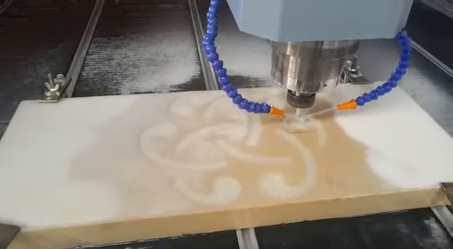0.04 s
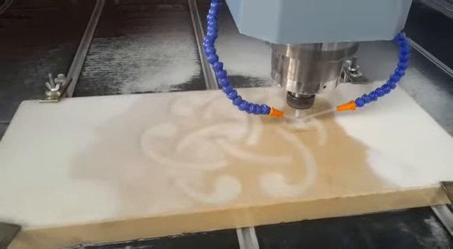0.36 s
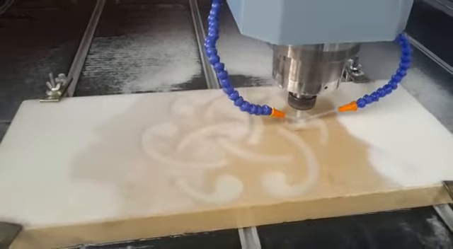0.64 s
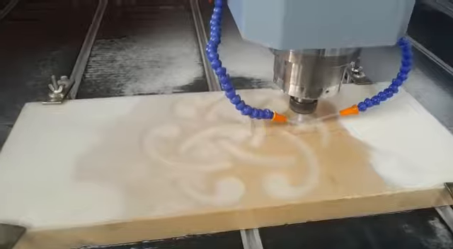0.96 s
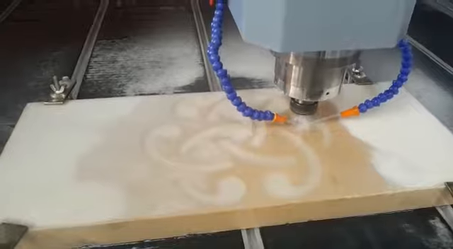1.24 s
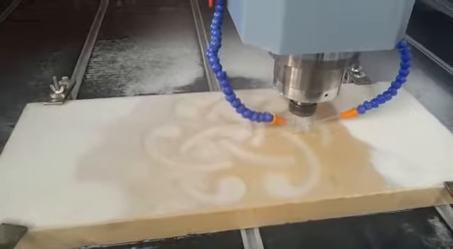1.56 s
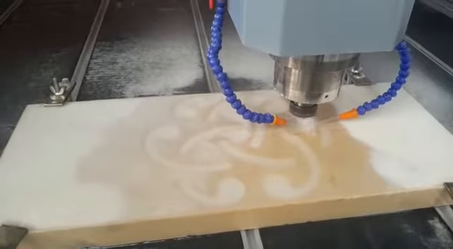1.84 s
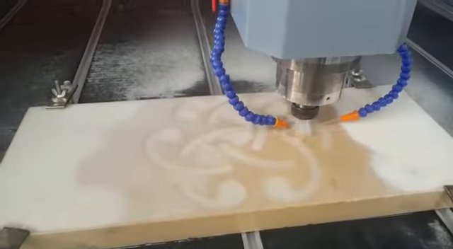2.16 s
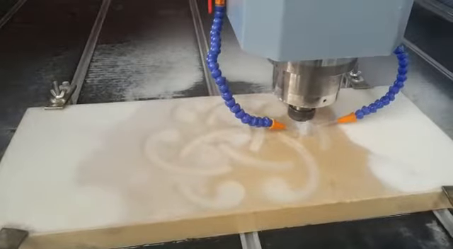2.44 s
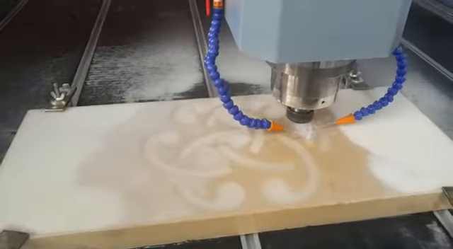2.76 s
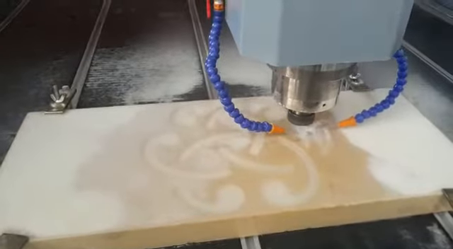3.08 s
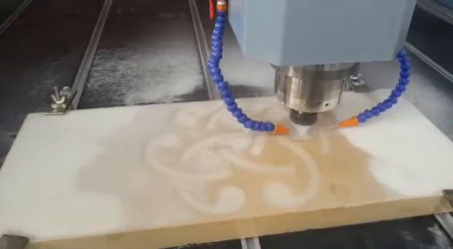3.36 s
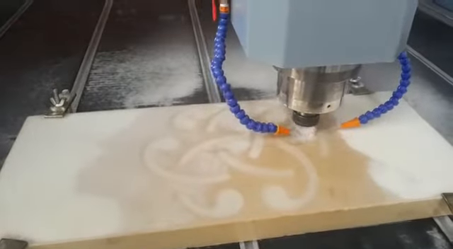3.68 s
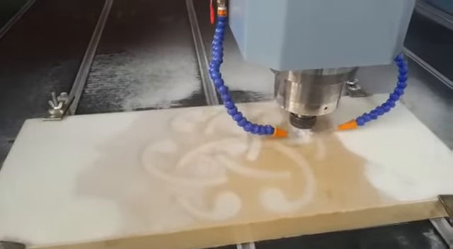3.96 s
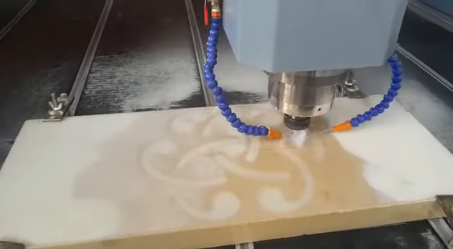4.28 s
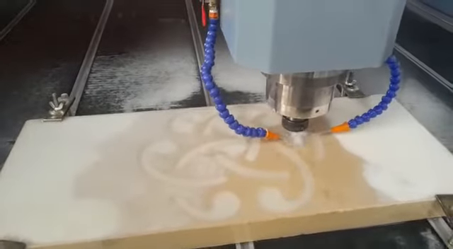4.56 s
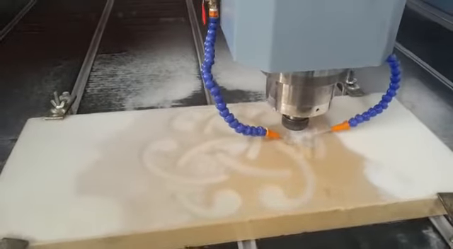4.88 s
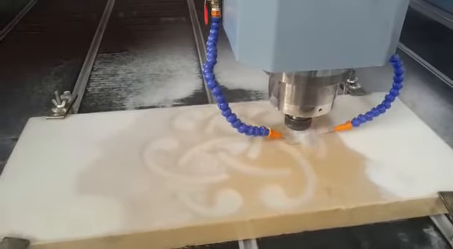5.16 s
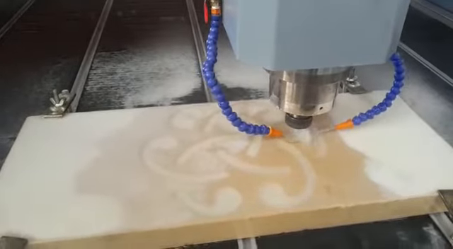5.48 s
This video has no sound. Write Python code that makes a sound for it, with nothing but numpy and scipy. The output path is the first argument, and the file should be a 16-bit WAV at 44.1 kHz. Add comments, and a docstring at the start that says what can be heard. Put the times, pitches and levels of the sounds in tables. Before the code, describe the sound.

In a workshop, a router spindle spins over a wet stone slab, humming and whining in a swelling rush of air and coolant spray. After nearly two seconds the bit bites and the rush falls back. Shrill, ringing scrapes follow in uneven passes, with short chattering squeals, while the feed motors sing faintly underneath. The treble sits mostly in the left microphone.

```python
"""A router spindle turns at 18000 rpm over a wet stone slab in a workshop. Its unbalance hums and its
motor whines in a swelling rush of air and coolant. From 1.3 s the feed motors sing as they move the head.
At 1.8 s the bit bites and the rush falls back: the bit scrapes the stone once a turn, rings shrilly and
chatters in bursts to the end. The treble reaches mostly the left microphone."""
import sys
import numpy as np
from scipy import signal
from scipy.fft import rfft, irfft, next_fast_len
from scipy.io import wavfile
from scipy.ndimage import uniform_filter1d, minimum_filter1d, map_coordinates

SR = 44100
rng = np.random.default_rng(int(sys.argv[2]) if len(sys.argv) > 2 else 0)


def unload_audio(sound):
    """Save the sound as a 16-bit wav file, at the path given as the first command line argument."""
    columns = np.transpose(np.atleast_2d(sound))
    # keep every value between -1 and 1, then stretch to whole-number steps
    steps = np.round(np.clip(columns, -1, 1) * 32767)
    wavfile.write(sys.argv[1], SR, steps.astype(np.int16))


N = 247842
TIME_S = np.arange(N) / SR
TURN_HZ = 299.65
BITE_S, ENTRY_S = 1.765, 0.07
BUILD_S = 0.39  # time constant of the opening swell

# Stereo balance. Each row: frequency in Hz, left over right in dB.
PAN = [(100, 1), (300, 2), (500, 0.5), (1200, -0.5), (1900, -4), (2800, -7), (3800, -1), (4600, 1),
       (5400, 8.5), (6200, 11.5), (7600, 25.5), (9300, 14), (10200, 18), (12000, 85)]
# Passes of the bit through the stone. Each row: start and end in seconds, scrape level in dB,
# share that follows its own marks from 0 to 1, brightness in dB per octave.
PASSES = [(1.79, 1.815, -23, .9, 0), (1.825, 1.9, -17.6, .95, 12), (1.9, 1.945, -20.5, .95, 0),
          (1.96, 2.16, -21.4, .8, 2), (2.175, 2.3, -22, .95, -6), (2.38, 2.44, -33, .5, 0),
          (2.755, 3.0, -23.1, .95, -1), (3.038, 3.29, -23, .95, -4), (3.3, 3.78, -25.3, .4, -1),
          (3.78, 3.935, -24.3, .35, 13), (3.945, 3.995, -22.8, .9, 0), (4.005, 4.035, -23, .9, -16),
          (4.055, 4.12, -26, .8, -12), (4.13, 4.34, -24.3, .5, -1), (4.355, 4.72, -26.3, .3, 3),
          (4.92, 5.14, -23.2, .95, -2), (5.2, 5.52, -24.5, .7, 0), (5.56, 5.7, -24, .95, -2)]


def amp(db):
    """Decibels to gain."""
    return 10 ** (np.asarray(db) / 20)


def along(points, hz):
    """Interpolate (Hz, value) points on a log axis."""
    point_hz, values = np.transpose(points)
    return np.interp(np.log(hz + 1), np.log(point_hz + 1), values)


def curves(rows):
    """One value per sample for each column after the time."""
    times_s, *columns = np.transpose(rows)
    return [np.interp(TIME_S, times_s, column) for column in columns]


def wobble(rate_hz):
    """Smooth random curve, rate_hz knots a second."""
    knots = rng.standard_normal(int(N * rate_hz / SR) + 4)
    return map_coordinates(knots, [TIME_S * rate_hz])


def spell(start_s, end_s, attack_s, release_s):
    """Attack, hold and release as a gain from 0 to 1."""
    return np.clip(0.5 + np.minimum((TIME_S - start_s) / attack_s, (end_s - TIME_S) / release_s), 0, 1)


def spells(rows, ramp_s):
    """Summed gain of events that ramp in and out."""
    return sum(amp(db) * spell(start_s, end_s, ramp_s, ramp_s) for start_s, end_s, db in rows)


def engaged(entry_s=ENTRY_S):
    """0 while the tool runs free, 1 once it is in the stone."""
    return np.clip((TIME_S - BITE_S) / entry_s, 0, 1)


def staged(free_db, cutting_db, build_db, build_s, entry_s=ENTRY_S):
    """Gain that moves by build_db to its free level, then to its cutting level at the bite."""
    shortfall_db = build_db * np.exp(-TIME_S / build_s)
    in_stone = engaged(entry_s)
    return amp((1 - in_stone) * (free_db - shortfall_db) + in_stone * cutting_db)


def filtered(x, response):
    """Apply a complex frequency response."""
    size = next_fast_len(N + SR // 2)
    return irfft(rfft(x, size) * response(np.fft.rfftfreq(size, 1 / SR)), size)[..., :N]


def ringing(x, modes):
    """x through a body's resonances, alternating in sign."""
    def response(hz):
        return sum((-1) ** k * amp(db) * 1j * hz * width_hz / (mode_hz**2 - hz**2 + 1j * hz * width_hz)
                   for k, (mode_hz, width_hz, db) in enumerate(modes))
    return filtered(x, response)


def sides(pan_db):
    """Left and right gains whose mean is 1."""
    gains = amp(np.array([pan_db, -pan_db]) / 2).reshape(2, -1)
    return gains / gains.mean(0)


def placed(pair, left_lead_s=0.0002):
    """Two unrelated signals as the microphones hear them, their mean at rms 1."""
    # Likeness of the channels. Each row: frequency in Hz, correlation.
    likeness = [(60, 0.63), (300, 1), (550, 0.93), (1000, 0.38), (2000, 0.028), (10000, 0.068)]

    def blend(hz):
        angle = np.arccos(np.clip(along(likeness, hz), -1, 1)) / 2
        return np.array([np.ones_like(hz), np.tan(angle)])

    def arrival(hz):
        lead = np.exp(1j * np.pi * hz * left_lead_s * np.array([[1], [-1]]))
        return np.sqrt(sides(2 * along(PAN, hz))) * lead

    mid, side = filtered(pair, blend)
    stereo = filtered(np.array([mid + side, mid - side]), arrival)
    return stereo / np.std(stereo.mean(0))


def white():
    """Two unrelated white noises."""
    return rng.standard_normal((2, N))


def noise(spectrum, patchy_db):
    """Two coloured noises with patches of random gain."""
    frames = signal.stft(white(), nperseg=512)[2]
    patches = uniform_filter1d(rng.standard_normal(frames.shape[1:]), size=8, axis=0)
    patches = uniform_filter1d(patches, size=8, axis=1)
    patches /= np.sqrt(np.mean(patches ** 2))
    pair = signal.istft(frames * amp(patchy_db * patches), nperseg=512)[1][:, :N]
    return filtered(pair, lambda hz: amp(along(spectrum, hz)))


def tones(lines, waver_db, drift_rad, rate_hz):
    """Steady whistles, each wavering in level and phase."""
    return sum(sides(pan_db) * amp(db + waver_db * wobble(2 * rate_hz))
               * np.sin(2 * np.pi * hz * TIME_S + drift_rad * wobble(rate_hz))
               for hz, db, pan_db in lines)


def orders(turns, partials, drift_rad):
    """Tones locked to the shaft."""
    return sum(amp(db) * np.sin(2 * np.pi * (order * turns + rng.random()) + drift_rad * wobble(12))
               for order, db in partials)


def spindle_hum(turns):
    """Unbalance hums at the shaft speed."""
    # Hum partials. Each row: multiple of the shaft speed, relative level in dB.
    partials = [(1 / 3, -22), (1, 0)]
    # Hum envelope. Each row: time in seconds, level in dB.
    envelope = [(0, -22), (.5, -18), (.85, -21), (1.75, -21), (1.785, -27), (1.822, -36), (1.845, -24),
                (1.88, -27), (1.925, -37), (1.97, -29), (2.1, -28), (2.3, -32), (2.73, -33), (3.3, -31),
                (3.65, -35), (3.8, -26.5), (4.04, -33), (4.2, -27.5), (4.85, -32.5), (5.62, -29.5)]
    hum_db, = curves(envelope)
    lead_turns = 0.018 * np.array([[1], [-1]])  # reaches the left first
    gain = sides(3.7) * amp(hum_db + engaged() * wobble(14))
    return gain * orders(turns + lead_turns, partials, drift_rad=0.027)


def spindle_drone(turns):
    """The hum's overtones swell as the side load shifts."""
    # Overtones led by the third. Each row: multiple of the shaft speed, relative level in dB.
    partials = [(2, -5), (3, 0), (7, -11)]
    # Load swells. Each row: start and end in seconds, third and fourth order levels in dB.
    swells = [(.35, .8, -40, -54), (.5, 1.053, -63, -36.5), (2.207, 2.65, -62, -44),
              (2.943, 3.03, -63, -38), (3.137, 3.223, -38, -48), (3.335, 3.824, -47, -40),
              (4.156, 4.345, -40, -31), (4.374, 4.707, -35.5, -38.5), (5.103, 5.505, -41.5, -36)]
    third_gain = staged(free_db=-30, cutting_db=-43.5, build_db=-0.5, build_s=BUILD_S)
    third_gain += spells([(start, end, db) for start, end, db, _ in swells], ramp_s=0.095)
    fourth_gain = staged(free_db=-33.5, cutting_db=-42.5, build_db=0.5, build_s=BUILD_S)
    fourth_gain += spells([(start, end, db) for start, end, _, db in swells], ramp_s=0.095)
    fourth = fourth_gain * orders(turns, [(4, 0)], drift_rad=0.22)
    waver = amp(0.1 + 1.6 * wobble(14))
    third = third_gain * orders(turns, partials, drift_rad=0.31)
    return sides(-1.4) * waver * (third + fourth)


def whistles(recovery_db_per_s=1.0):
    """High motor and inverter whistles, which sound quieter while the bit scrapes loudly."""
    # Motor and inverter lines. Each row: frequency in Hz, relative level in dB, left over right in dB.
    lines = [(5900, -22, 12), (6202, -20, 15), (6595, 0, 28), (9399, -18.5, 16), (10000, -15, 14),
             (10600, -22, 20), (10697, -21, 18), (12495, -28, 25), (13200, -33, 25), (14099, -21, 24)]
    # Envelope of the inverter's 5.3 kHz line. Each row: time in seconds, level in dB.
    envelope = [(0, -31.5), (.33, -30), (.5, -26), (.68, -27.5), (.8, -29.5), (1.76, -30.5), (1.84, -40),
                (5.62, -37)]
    flicker = amp(1.9 * engaged() * wobble(14))
    gain = staged(free_db=-21, cutting_db=-34, build_db=9.5, build_s=0.28, entry_s=0.054)
    gain *= amp(recovery_db_per_s * engaged() * (TIME_S - BITE_S))
    whine = gain * tones(lines, waver_db=0.6, drift_rad=0.11, rate_hz=16)
    inverter_db, = curves(envelope)
    inverter = amp(inverter_db) * tones([(5300, 0, 10)], waver_db=0.7, drift_rad=0.15, rate_hz=16)
    duck = 1 / np.hypot(1, pressure() / amp(-23))
    return dipping() * flicker * duck * (whine + inverter)


def air(cutoff_hz=2200):
    """Air whirls round the free tool and booms in the machine's cavities until the bit enters."""
    # Cavity modes. Each row: frequency in Hz, width in Hz, relative level in dB.
    cavities = [(100, 37, -10), (237, 230, -16.5), (471, 120, -2), (613, 108, 1.5), (838, 39, 3.5),
                (923, 98, 1), (1027, 71, 2), (1453, 22, -6.5)]
    boom = filtered(ringing(white(), cavities), lambda hz: 1 / (1 + (hz / cutoff_hz) ** 4))
    roar_db = -21 - 5.1 * TIME_S - 11 * np.exp(-TIME_S / BUILD_S)  # swells, then eases
    overshoot_db = 1.9 * spell(0.42, 0.83, attack_s=0.15, release_s=0.15)
    gusts = amp(0.7 * wobble(25))
    return (1 - engaged()) * amp(roar_db + overshoot_db) * gusts * placed(boom)


def coolant(recovery_db_per_s=1.01):
    """Jets wash over the slab and stir the machine's panels; flung spray hisses and spatters."""
    # Wash and spray spectra. Each row: frequency in Hz, relative density in dB.
    wash_spectrum = [(25, -19), (60, -14), (98, -8), (130, -8.5), (180, -2), (290, 2), (380, -3),
                     (550, 1.5), (1000, 0), (1900, 0.5), (2500, -4.5), (3100, -4.5), (5000, -9),
                     (10000, -47)]
    spray_spectrum = [(800, -19), (1800, -4), (2700, -0.5), (3300, 0.5), (4500, -2.5), (5500, -1),
                      (6500, 1), (7600, 6.5), (8300, 4), (9000, -2), (10500, -6), (12000, -15.5),
                      (14500, -31)]
    # Panel modes. Each row: frequency in Hz, width in Hz, relative level in dB.
    panel_modes = [(1012, 88, -1.5), (1448, 215, -1.5), (1717, 45, 1), (2070, 68, -1), (2294, 220, -0.5),
                   (2580, 270, -4.5), (3340, 270, -12.5), (3930, 99, -19)]
    # Wash envelope. Each row: time in seconds, relative level in dB.
    envelope = [(0, -32.5), (.5, -27.5), (1.22, -24.5), (1.5, -28), (1.79, -24.5), (1.86, -33.5),
                (2.35, -35), (2.85, -36), (3.25, -35.5), (3.4, -33), (3.62, -35.5), (3.85, -31.3),
                (3.95, -37), (4.08, -35.5), (4.22, -34.5), (4.75, -33), (5.03, -34.5), (5.2, -35.5),
                (5.62, -34.7)]
    wash_db, = curves(envelope)
    wash = amp(3) * placed(noise(wash_spectrum, patchy_db=1))
    panels = amp(-1.5) * placed(ringing(white(), panel_modes))
    spatter = amp(0.59 * wobble(300) + 0.46 * wobble(12))
    spray_gain = staged(free_db=-21.5, cutting_db=-30.5, build_db=2.5, build_s=0.13)
    spray_gain *= amp(recovery_db_per_s * engaged() * (TIME_S - BITE_S))
    spray = spray_gain * spatter * placed(noise(spray_spectrum, patchy_db=1))
    return dipping() * (amp(wash_db + 0.93 * wobble(30)) * (wash + panels) + spray)


def free_tool():
    """The tool squeals thinly before it meets the stone."""
    # Squeals. Each row: start and end in seconds, level in dB.
    squeals = [(1.15, 1.3, -31), (1.42, 1.6, -30.5)]
    return spells(squeals, ramp_s=0.06) * tones([(3483, 0, -8)], waver_db=2, drift_rad=0.5, rate_hz=30)


def feed(ramp_s=0.16, long_ramp_s=0.033):
    """Each axis motor sings while it moves the head; the gantry rumbles on its screw."""
    # Axis motor tones. Each row: frequency in Hz, relative level in dB, left over right in dB.
    cross_lines = [(818, -8, 0), (1023.5, -1, -2)]
    long_lines = [(2212, 5.5, -12), (2390, -9, -4), (3320, -6, -5)]
    # Axis moves, screw runs and rumbles. Each row: start and end in seconds, relative level in dB.
    cross_moves = [(1.33, 1.56, -29), (2.0, 2.9, -37), (2.23, 2.58, -42)]
    long_moves = [(2.17, 3.7, -35), (4.67, 4.69, -27), (4.752, 4.795, -24), (4.843, 4.87, -22),
                  (4.87, 4.903, -17.5), (4.96, 4.99, -30), (5.085, 5.14, -31), (5.14, 5.185, -23),
                  (5.185, 5.32, -27.5), (5.42, 5.51, -30)]
    screw_runs = [(3.25, 3.9, -40), (4.2, 4.55, -40), (4.58, 4.85, -35.5)]
    rumbles = [(2.4, 2.7, -50), (3.3, 4.28, -49), (4.28, 4.48, -42), (4.48, 5.4, -43.5), (5.4, 5.7, -48)]
    # Gantry rumble spectrum. Each row: frequency in Hz, relative density in dB.
    rumble_spectrum = [(60, -26), (105, -2), (138, 15.5), (165, -2), (210, 9), (300, -26), (600, -43)]
    cross_motor = tones(cross_lines, waver_db=1.3, drift_rad=0.35, rate_hz=20)
    long_motor = amp(-9) * tones(long_lines, waver_db=2.5, drift_rad=0.8, rate_hz=40)
    screw = tones([(1104, 0, 0)], waver_db=2, drift_rad=0.45, rate_hz=20)
    rumble = placed(noise(rumble_spectrum, patchy_db=0.5))
    return (spells(cross_moves, ramp_s) * cross_motor + spells(long_moves, long_ramp_s) * long_motor
            + spells(screw_runs, ramp_s) * screw + spells(rumbles, ramp_s) * rumble)


def pressure(graze_db=-39, graze_db_per_s=3, catch_s=0.0041):
    """Scraping force as a gain: full in each pass, grazing in between, surging where the bit catches."""
    # Catches on hard grains. Each row: time in seconds, surge in dB.
    catches = [(1.921, 3), (2.03, 2), (2.054, 2), (2.146, 3), (2.181, 4), (2.283, 3), (2.4, 5), (2.528, 4),
               (2.865, 3), (2.978, 2), (3.067, 4), (3.108, 2.5), (3.155, 2), (3.224, 3), (3.38, 3),
               (3.662, 3), (3.731, 5), (3.769, 4.5), (3.841, 7.5), (3.882, 3), (3.908, 3), (3.97, 3),
               (4.104, 5), (4.183, 3), (4.24, 3), (4.318, 3), (4.99, 2.5), (5.013, 2.5), (5.268, 3),
               (5.327, 3), (5.474, 3), (5.61, 4)]
    passes = sum(amp(db) * spell(start_s, end_s, attack_s=0.06, release_s=0.055)
                 for start_s, end_s, db, *_ in PASSES)
    graze = engaged() * amp(graze_db + graze_db_per_s * (TIME_S - BITE_S))
    surge_db = sum(db * np.exp(-((TIME_S - at_s) / catch_s) ** 2) for at_s, db in catches)
    return np.maximum(passes, graze) * amp(surge_db)


def recut(x, memory):
    """The bit meets the marks of its last turn, so each scrape partly repeats the one before."""
    return filtered(x, lambda hz: 1 / (1 - memory * np.exp(-2j * np.pi * hz / TURN_HZ)))


def tilted(x, db_per_octave, pivot_hz=7600):
    """Tip the spectrum about the bit's ring by a moving slope."""
    hz, frame_s, frames = signal.stft(x, SR, nperseg=256)
    octaves = np.clip(np.log2((hz + 1) / pivot_hz), -0.6, 0.2)
    tilt_db = octaves[:, None] * np.interp(frame_s, TIME_S, db_per_octave)
    return signal.istft(frames * amp(tilt_db), SR, nperseg=256)[1][:, :N]


def scraping(contact):
    """The bit rings as it drags through fresh grit and its own marks, over hard and soft spots."""
    # Spectrum of the bit on grit. Each row: frequency in Hz, relative density in dB.
    grit = [(2500, -30), (4500, -30), (6200, -5.5), (6800, -2.5), (7140, 2.5), (7500, 3.5), (7830, 2.5),
            (8100, 1.5), (8400, -3), (8700, -6.5), (9300, -12), (11700, -21), (12500, -30), (14500, -33)]
    share, db_per_octave = curves([(at_s, followed, slope) for start_s, end_s, _, followed, slope
                                   in PASSES for at_s in (start_s, end_s)])
    fresh = placed(contact * noise(grit, patchy_db=1.5))
    marks = placed(recut(contact * noise(grit, patchy_db=2), memory=0.73))
    scrape = np.sqrt(share) * marks + np.sqrt(1 - share) * fresh
    hardness = amp(0.65 * wobble(70) + 0.75 * wobble(220))
    return amp(0.9) * pressure() * hardness * tilted(scrape, db_per_octave)


def frame_ring(turns, contact, shake, growth_db_per_s=0.48):
    """The cut rings housing and gantry, hardest at the bite; the housing picks out the sixth order."""
    # Frame modes. Each row: frequency in Hz, width in Hz, relative level in dB.
    housing_modes = [(599, 66, -3), (1494, 240, -7), (1818, 33, 4.5), (2100, 38, -6), (2417, 41, -3.5),
                     (3260, 63, -20)]
    gantry_modes = [(1403, 36, -2), (1510, 32, -3.5), (1655, 26, -9.5), (2070, 12, -0.5), (2213, 17, 4),
                    (2480, 15, -4.5), (2600, 17, -14), (3110, 25, -5.5), (3335, 13, 3.5), (3450, 11, -14),
                    (3620, 27, -8), (4430, 20, -1.5), (4790, 38, -3.5)]
    jolt = spell(1.809, 1.832, attack_s=0.018, release_s=0.027)
    load_db = -37 + growth_db_per_s * (TIME_S - BITE_S) + 1.5 * wobble(16)
    load = amp(-29.5) * jolt + engaged() * dipping() * amp(load_db)
    sixth = orders(turns, [(6, 0)], drift_rad=0.8) * amp(2 * wobble(45) + 3 * jolt * wobble(300))
    sixth_gain = amp(-25.5) * jolt + amp(-42) * engaged()
    housing = placed(ringing(shake, housing_modes))
    gantry = amp(1.5) * placed(ringing(contact * white(), gantry_modes))
    return load * (housing + gantry) + sixth_gain * sixth


def chatter_tone(turns, order):
    """A rough tone at or just under one shaft overtone, with its neighbours as sidebands."""
    # Chatter partials. Each row: offset in shaft orders, relative level in dB.
    sidebands = [(-1, -14), (0, 0), (1, -13), (2, -11), (3, -9)]
    # Pitch sag. Each entry: shaft order, distance below it in Hz.
    sag_hz = {17: 19, 18: 3, 24: 16, 26: 0}
    tone = np.zeros((2, N))
    for offset, db in sidebands:
        cycles = (order + offset) * turns - sag_hz[order] * TIME_S
        phase = 2 * np.pi * cycles + 1.3 * wobble(35) + 0.35 * wobble(220)
        pan_db = along(PAN, (order + offset) * TURN_HZ)
        tone += sides(pan_db) * amp(db + 1.8 * wobble(70)) * np.sin(phase)
    return tone


def chatter(turns, shake, buzz_start_s=1.96, growth_db_per_s=1.2):
    """The collet buzzes as the bit bears down; in bursts it locks to a shaft overtone and squeals."""
    # Collet modes. Each row: frequency in Hz, width in Hz, relative level in dB.
    collet_modes = [(4470, 47, -7), (4730, 55, -8), (5060, 63, -2), (5470, 150, 0.5), (6250, 90, -6),
                    (6050, 110, -6)]
    # Chatter bursts. Each row: start and end in seconds, level in dB, shaft order.
    bursts = [(1.765, 1.815, -24.5, 18), (1.845, 1.925, -17.5, 26), (1.87, 1.96, -22, 24),
              (1.965, 2.005, -26.5, 18), (2.17, 2.215, -23, 24), (2.27, 2.32, -25.5, 18),
              (2.315, 2.345, -26, 17), (2.34, 2.38, -32, 18), (2.695, 2.745, -27.5, 18),
              (2.8, 2.885, -24, 26), (3.005, 3.035, -28, 17), (3.02, 3.055, -26, 18),
              (3.18, 3.215, -29, 18), (3.245, 3.295, -22, 18), (3.355, 3.405, -30, 18),
              (3.79, 3.83, -27, 18), (3.955, 3.99, -28, 18), (3.965, 4.005, -22.5, 26),
              (4.005, 4.04, -22.5, 18), (4.048, 4.074, -24.5, 18), (4.06, 4.092, -24.5, 17),
              (4.125, 4.16, -27, 18), (4.23, 4.66, -33, 17), (4.43, 4.47, -29, 18), (4.74, 4.81, -31, 17),
              (4.945, 4.985, -21, 18), (5.04, 5.11, -28.5, 18), (5.11, 5.19, -25, 18),
              (5.46, 5.52, -33, 17), (5.525, 5.56, -24.5, 18)]
    onset = spell(buzz_start_s, np.inf, attack_s=0.03, release_s=1)
    growth = amp(growth_db_per_s * (TIME_S - buzz_start_s))
    bearing = np.sqrt(pressure() / amp(-24))
    buzz = amp(-36) * placed(ringing(shake, collet_modes)) + amp(-38.5) * chatter_tone(turns, order=18)
    squeals = np.zeros((2, N))
    for order in sorted({row[3] for row in bursts}):
        gain = spells([row[:3] for row in bursts if row[3] == order], ramp_s=0.022)
        squeals += gain * chatter_tone(turns, order)
    slip = amp(1.2 * wobble(110) + 0.8 * wobble(30))
    return slip * (onset * growth * dipping() * bearing * buzz + squeals)


def cutting(turns):
    """Runout presses one side of the bit in once a turn, driving scrape, frame and collet."""
    angle = 2 * np.pi * turns + 0.51 * wobble(8.3)  # the contact point shifts round the bit
    contact = amp(3.9 * np.cos(angle) + 1.8 * wobble(500))
    scrape = scraping(contact)
    shake = recut(contact * white(), memory=0.7)
    return scrape + frame_ring(turns, contact, shake) + chatter(turns, shake)


def dipping():
    """Gain that dips briefly under the hardest scraping."""
    # Dips. Each row: start and end in seconds, gain in dB.
    dips = [(1.895, 1.95, -5), (2.15, 2.203, -4), (4.0, 4.11, -1.8)]
    return amp(sum(db * spell(start, end, attack_s=0.036, release_s=0.044) for start, end, db in dips))


def scene():
    """The shaft's slightly wandering rotation times both the hum and the cut."""
    shaft_hz = TURN_HZ + 0.255 * wobble(3.85)
    turns = np.cumsum(shaft_hz) / SR
    spindle = spindle_hum(turns) + spindle_drone(turns)
    return spindle + whistles() + air() + coolant() + free_tool() + feed() + cutting(turns)


def record(dry, ceiling=0.92, top_hz=14600):
    """Peak limiter, then a brick-wall low-pass."""
    needed = np.minimum(1, ceiling / (np.abs(dry).max(0) + 1e-9))
    gain = uniform_filter1d(minimum_filter1d(needed, size=200), size=200)
    return filtered(dry * gain, lambda hz: hz < top_hz)


dry = scene()
out = record(dry)
unload_audio(out)
```